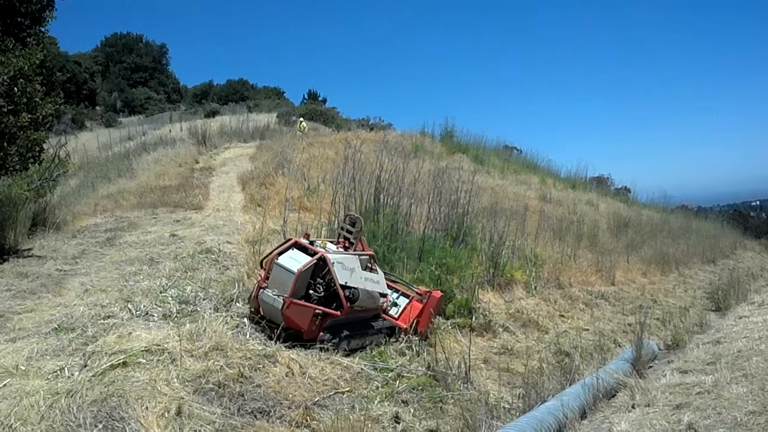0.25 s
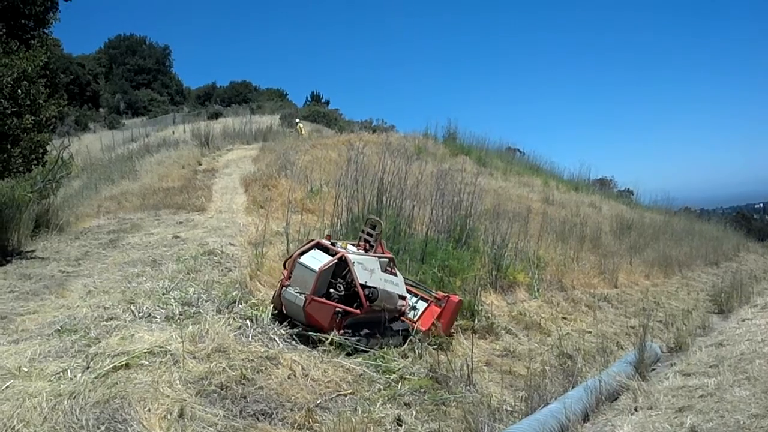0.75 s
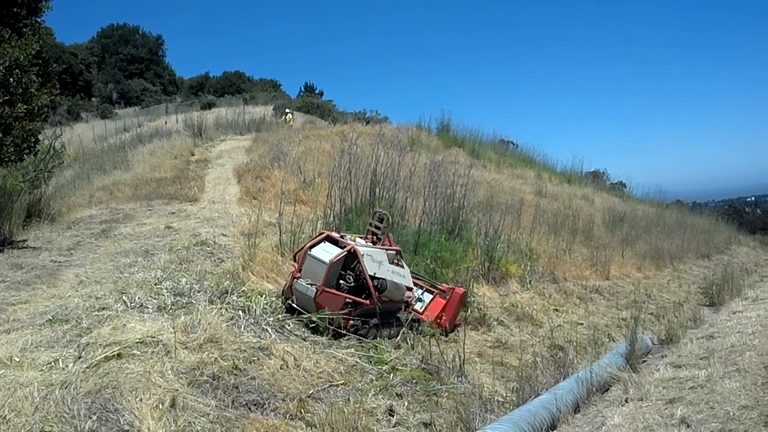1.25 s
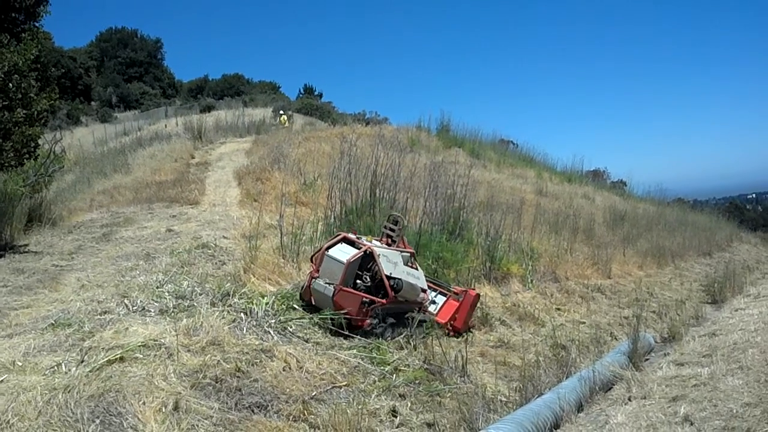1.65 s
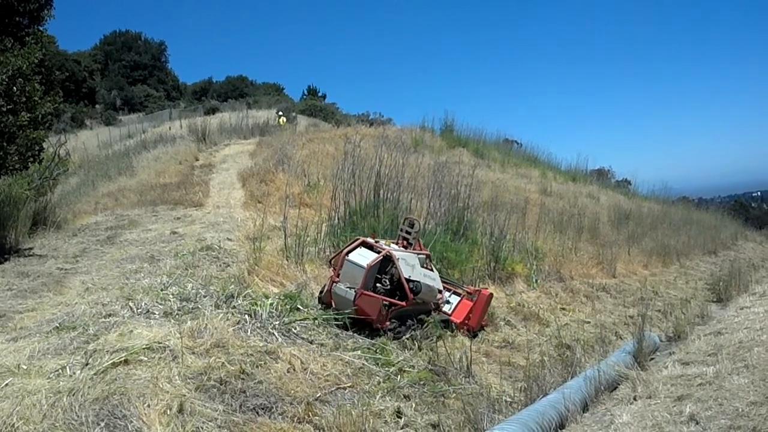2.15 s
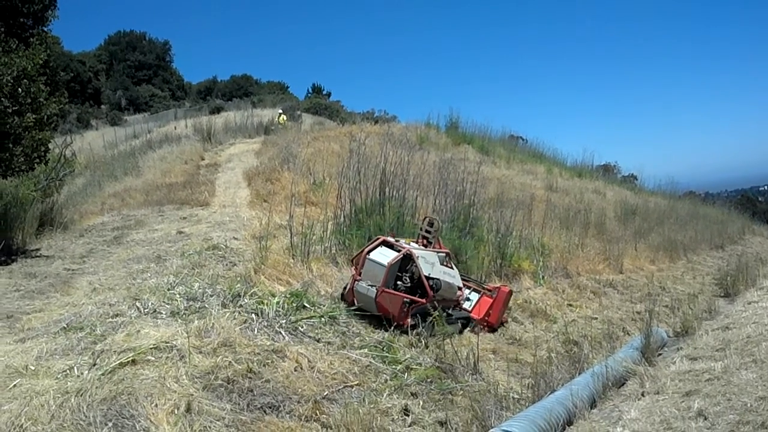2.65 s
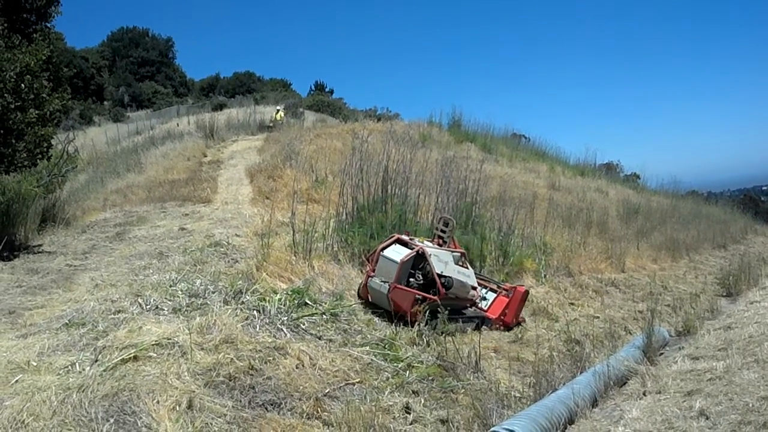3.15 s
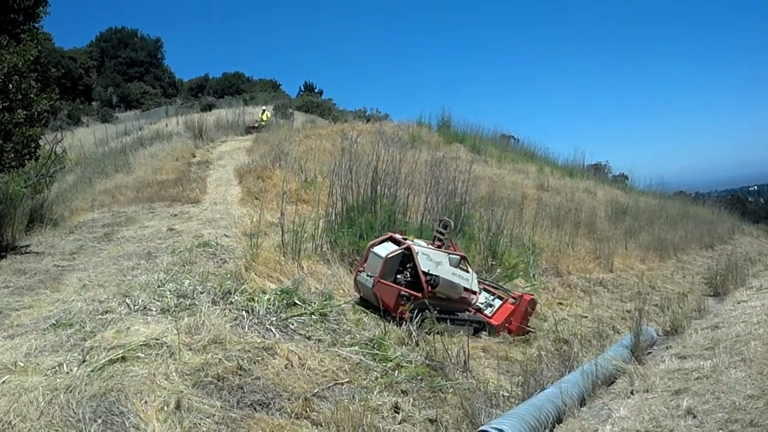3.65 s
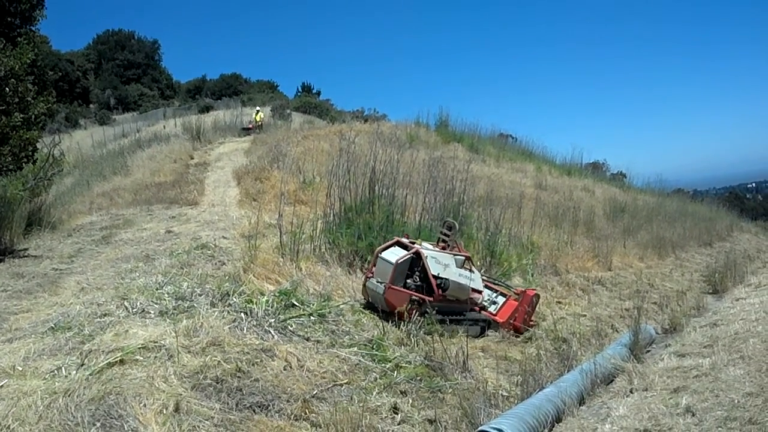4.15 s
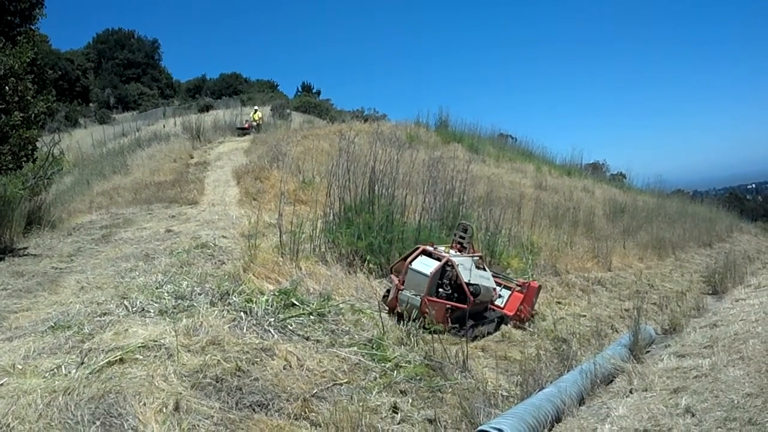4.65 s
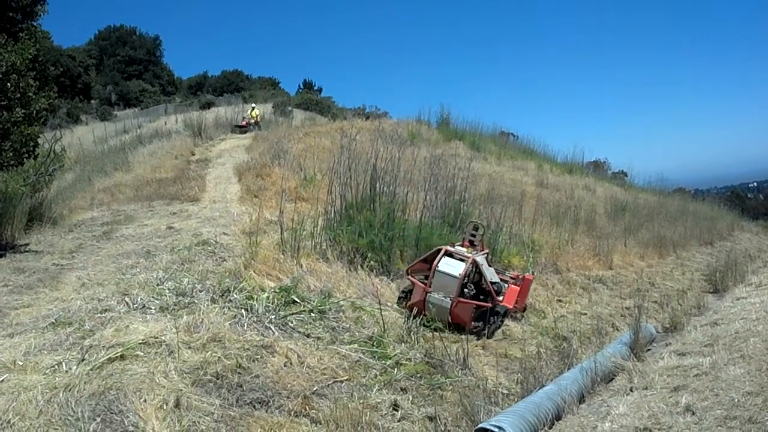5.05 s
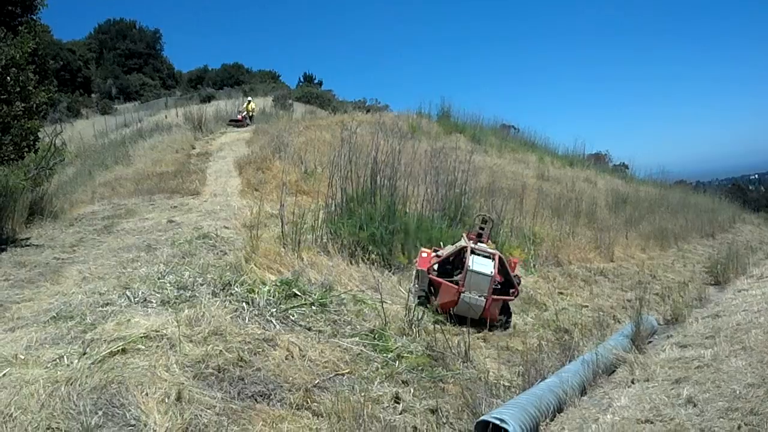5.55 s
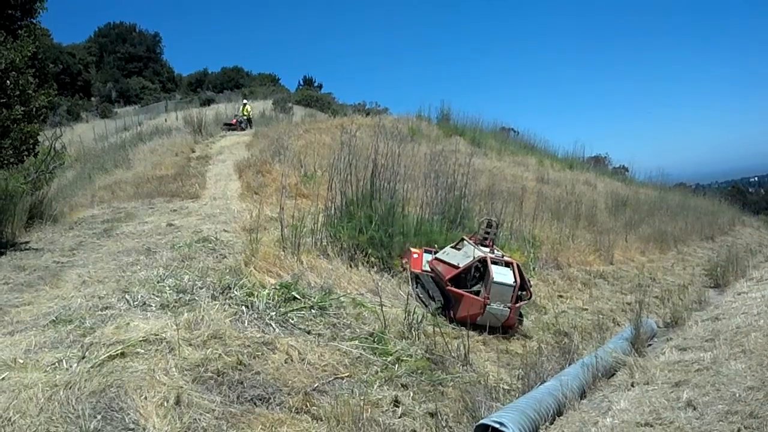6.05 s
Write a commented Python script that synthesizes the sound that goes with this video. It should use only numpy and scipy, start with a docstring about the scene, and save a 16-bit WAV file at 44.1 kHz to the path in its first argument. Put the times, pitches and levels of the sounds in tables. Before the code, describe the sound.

Outdoors on a dry grassy slope, a tracked flail mower runs continuously: uneven engine throb, metallic panel clatter, droning hum and a pulsing hiss of shredded stalks. Small ticks and hood rattles pepper it. Around halfway one hard snap makes the whole sound duck and slowly recover. Then cutting eases briefly as the machine turns, and wind rumbles and thuds against the close stereo microphones.

```python
"""A tracked flail mower works through dry grass on an open slope, heard by a close pair of microphones.
Uneven firings ring the V-twin's silencer, and its knocks shake a noisy clatter and sung orders from the panels.
The rotor hums, a higher hum swells late, and flails shred grass in a pulsing hiss of noise and cracks.
Filtered noise bursts make ticks, snaps, hood rattles and thuds; gusts rumble apart in left and right.
One hard snap drives a treble-sensing limiter, which ducks everything and lets go slowly."""
import sys
import numpy as np
from scipy import signal
from scipy.fft import rfft, irfft, next_fast_len
from scipy.io import wavfile
from scipy.ndimage import uniform_filter1d

SR = 44100
rng = np.random.default_rng(int(sys.argv[2]) if len(sys.argv) > 2 else 0)


def persist_wave(psi):
    """Save psi, clipped to +-1, as 16-bit WAV."""
    counts = np.round(np.clip(psi, -1, 1) * 32767).astype(np.int16)
    wavfile.write(sys.argv[1], SR, np.atleast_2d(counts).T)


N = 278484
TIME = np.arange(N) / SR
RECOVERY_DB_PER_S = 11.5  # climb of the level after a dip or a limited snap


def amp(db):
    """Decibels to gain."""
    return np.exp(np.asarray(db) * np.log(10) / 20)


def evened(x):
    """Scales to rms 1."""
    return x / np.sqrt(np.mean(x ** 2) + 1e-20)


def curve(rows, axis=1):
    """One column of a table of times, at every sample."""
    rows = np.array(rows)
    return np.interp(TIME, rows[:, 0], rows[:, axis])


def read(rows, hz, axis=1):
    """One column of a table of frequencies, on a log frequency axis."""
    rows = np.array(rows)
    return np.interp(np.log(hz + 1), np.log(rows[:, 0] + 1), rows[:, axis])


def causal(gain):
    """Gives a magnitude spectrum the phase of a thing that rings only after it is struck."""
    log_gain = np.log(gain + 1e-7)
    mirrored = np.r_[log_gain, log_gain[-2:0:-1]]
    return np.exp(np.conj(signal.hilbert(mirrored)))[:len(gain)]


def colour(x, spectrum, axis=1):
    """Causal filter with the given spectrum: it rings after a blow; rms 1."""
    gain = amp(read(spectrum, np.fft.rfftfreq(16384, 1 / SR), axis))
    taps = irfft(causal(gain))[:8192]
    return evened(signal.oaconvolve(np.atleast_2d(x), taps[None], axes=1)[:, :N])


def waver(rate_hz):
    """Smooth chance wandering of rms 1, up to the given rate."""
    t = np.linspace(0, N / SR, 1500)
    rates = np.geomspace(rate_hz / 8, rate_hz, 16)
    slow = sum(np.sin(2 * np.pi * (f * t + rng.random())) for f in rates)
    return np.interp(TIME, t, evened(slow))


def bursts(turns, beats, decay):
    """Power that jumps at each blow of the cycle and dies within a share of it; mean 1."""
    power = sum(amp(db) ** 2 * np.exp(-((turns - place) % 1) / decay) for place, db in beats)
    return power / power.mean()


def kicks(turns, beats, uneven):
    """One push at each blow of the cycle; its strength has a steady and a chance part."""
    out = np.zeros(N)
    for place, db in beats:
        at = np.flatnonzero(np.diff(np.floor(turns - place)))
        out[at] += amp(db) * (1 + uneven * rng.standard_normal(len(at)))
    return out


# sound travel from one capsule to the other, bending round the body between: (frequency [Hz], delay [s])
CAPSULE_DELAY = [(1400, 3.5e-4), (2830, 3.53e-4), (4150, 3.61e-4), (5500, 3.63e-4), (8300, 3.605e-4),
                 (13700, 3.64e-4)]


def port_angle(hz):
    """Half the phase by which sound reaches one capsule after the other."""
    return np.pi * hz * read(CAPSULE_DELAY, hz)


# width of the silent gaps cut round each comb null:
# (frequency [Hz], comb height at the gap's edge [share of full height])
GAP_WIDTHS = [(1400, 0.1), (2830, 0.34), (5500, 0.19), (8300, 0.31), (13700, 0.32)]


def gapped(comb, hz):
    """Filter shape that cuts a steep-sided silent gap round each null of a plain comb."""
    steep = (comb / read(GAP_WIDTHS, hz)) ** 6
    return comb * steep / (1 + steep)


# capsule difference against their sum, shaped by the ground reflection:
# (frequency [Hz], level [dB], part in phase [share], part in quadrature [share])
CAPSULE_DIFFERENCE = [(60, 8, -1, -0.83), (140, -2.5, -0.18, -1.17), (230, -11, -0.37, -0.95),
                      (320, -6, -0.29, -0.7), (428, 1, 0.68, 1), (503, 8.5, 0.25, -0.54),
                      (750, -15.5, -0.81, -1.8), (900, -11, 0.068, 0.092), (1490, -9.5, 0.12, -0.18),
                      (2110, -1, 0.94, -0.81), (3030, 2, -0.1, -0.94), (5000, -2, 0.019, -0.89),
                      (15000, 1, 0.34, -0.16)]


def capsules(direct, scattered):
    """Two close capsules, each less the delayed other, give interleaved combs; gaps are cut at the nulls."""
    size = next_fast_len(len(direct))
    hz = np.fft.rfftfreq(size, 1 / SR)
    a, b, angle = rfft(direct, size), rfft(scattered, size), port_angle(hz)
    like = read(CAPSULE_DIFFERENCE, hz, axis=2) + 1j * read(CAPSULE_DIFFERENCE, hz, axis=3)
    unlike = np.sqrt(np.clip(1 - abs(like) ** 2, 0, 1))
    difference = amp(read(CAPSULE_DIFFERENCE, hz)) * (like * a + unlike * b)
    mid = a * gapped(np.sin(np.maximum(angle, np.pi / 2)), hz)  # the bass of the sum is equalised flat
    side = difference * gapped(np.cos(angle), hz)
    return irfft([mid + side, mid - side], size)[:, :len(direct)]


# what the turning machine shows the microphones: (time [s], aspect [0 side, 1 rear, 2 far corner])
ASPECT = [(0, 0), (3.8, 0), (4.25, 0.53), (5.2, 1.4), (5.6, 1.3), (5.95, 1.58), (6.31, 1.85)]


def facing(side_db, rear_db, far_db):
    """Level in dB of a part that radiates differently to each aspect, as the machine turns."""
    return np.interp(curve(ASPECT), np.arange(3), [side_db, rear_db, far_db])


# engine speed, hunting on its governor: (time [s], four-stroke cycle rate [Hz])
ENGINE_SPEED = [(0.0, 28.32), (0.19, 28.57), (0.58, 28.26), (0.99, 28.84), (1.3, 28.28), (1.6, 28.32),
                (1.88, 28.77), (2.2, 27.95), (2.47, 28.39), (2.74, 28.18), (3.83, 28.31), (4.04, 28.85),
                (4.31, 27.94), (4.86, 28.44), (5.01, 28.02), (5.76, 28.0), (5.84, 28.3), (6.31, 28.14)]


def engine_turns():
    """Running count of engine cycles: the summed speed, which times every firing and knock."""
    return 0.366 + np.cumsum(curve(ENGINE_SPEED)) / SR


# flail rotor, slowly losing speed in the grass: (time [s], turning rate [Hz])
ROTOR_SPEED = [(0.0, 52.6), (0.8, 52.9), (1.3, 52.6), (2.1, 51.7), (2.8, 52.0), (3.4, 51.3), (4.6, 51.0),
               (5.3, 50.5), (6.31, 50.2)]


def rotor_turns():
    """Running count of rotor turns: the summed speed, which times the flails."""
    return np.cumsum(curve(ROTOR_SPEED)) / SR


# the two uneven firings: (place in the cycle [0-1], relative level [dB])
FIRING_BEATS = [(0.0, -4), (0.395, -3.6)]
# silencer response: (frequency [Hz], from the side [dB], from the far corner [dB])
SILENCER = [(28.4, -81, -86), (57, -23.5, -26), (85, -15.5, -18), (111.5, -9, -32), (133, 2, 0.5),
            (170, 1, -0.5), (181, -1, -3), (222, -2, -7), (252, 3.5, 7.5), (284, -16, -15.5),
            (341, -38, -42), (700, -53, -46)]


def exhaust(turns, uneven=0.046):
    """One puff per firing, each a little different, rings the silencer; its colour shifts with the turn."""
    puffs = kicks(turns, FIRING_BEATS, uneven)
    turned = curve(ASPECT) / 2
    from_side = colour(puffs, SILENCER)[0]
    from_corner = colour(puffs, SILENCER, axis=2)[0]
    throb = (1 - turned) * from_side + turned * from_corner
    return np.array([throb * amp(facing(side_db=-31, rear_db=-32, far_db=-31)), np.zeros(N)])


def clatter_db(load_share=0.21):
    """Level of block and panels: set by their aspect, plus a share of each dB of cutting above its mean."""
    bite = curve(CUTTING_LEVEL)
    return facing(side_db=-31.5, rear_db=-30.5, far_db=-31.1) + load_share * (bite - bite.mean())


# piston and valve knocks: (place in the cycle [0-1], relative level [dB])
KNOCK_BEATS = [(0.285, 13.5), (0.535, 16), (0.78, 9), (0, 11.5)]
# block and panel colour: (frequency [Hz], relative level per Hz [dB])
BLOCK_COLOUR = [(25, -54), (60, -39), (110, -12.5), (230, -8.5), (320, -11.5), (410, -9.5), (490, -14),
                (690, -5.5), (900, -4), (1000, -5), (1280, -12), (1430, -7.5), (1530, -8.5), (1650, -9),
                (2000, -11.5), (3200, -21), (8000, -30)]


def clatter(turns, knocking=0.16, ring=0.11, repeating=0.072, flutter_db=0.75):
    """Knocks shake block and panels; part of the rattle repeats exactly in every cycle."""
    size = 1500  # points of noise in the repeating cycle
    places = np.arange(size) / size
    cycles = rng.standard_normal((2, size))
    repeated = np.array([np.interp(turns, places, cycle, period=1) for cycle in cycles])
    fresh = rng.standard_normal((2, N))
    rattle = np.sqrt(repeating) * evened(repeated) + np.sqrt(1 - repeating) * fresh
    force = np.sqrt(1 - knocking + knocking * bursts(turns, KNOCK_BEATS, ring))
    return colour(rattle * force, BLOCK_COLOUR) * amp(clatter_db() + flutter_db * waver(13))


# engine orders that sing out of the panels, before their common trim against the clatter:
# (multiple of the cycle rate, from the side [dB], from behind [dB], from the far corner [dB])
SUNG_ORDERS = [(14, -20, -24, -4.5), (16, -23, -26, -22), (20, -15.5, -30, -26), (22, -14.5, -15, -23),
               (23, -14, -13, -14), (24, -7, -16.5, -2), (25, -12.5, -33, -28), (26, -11.5, -10, -14),
               (27, -10.5, -17, -16), (28, -9, -10, -3), (29, -14, -13, -3.5), (30, -10, -11, -24),
               (31, -18.5, -7.5, -13), (32, -9, -4.5, -9), (33, -37, -12, -12), (35, -25, -13, -22),
               (37, -31, -31, -32), (42, -14.5, -25, -32), (50, -14, -18, -11), (57, -16, -29, -19),
               (58, -17.5, -13, -15), (60, -24, -19, -20)]


def drone(turns, sung_db=-0.57, waver_db=2.5, slip_rad=0.66, lag=0.041):
    """Engine orders sing from the panels, loosely in step with the knocks; their mix follows the aspect."""
    tone = np.zeros(N)
    for order, *aspect_db in SUNG_ORDERS:
        level_db = facing(*aspect_db) + waver_db * waver(7)
        driven = sum(amp(db) * np.exp(-2j * np.pi * order * (place + lag)) for place, db in KNOCK_BEATS)
        phase = 2 * np.pi * order * turns + np.angle(driven) + slip_rad * waver(8)
        tone += amp(level_db) * np.cos(phase)
    return np.array([tone * amp(clatter_db() + sung_db), np.zeros(N)])


# rotor hum: (multiple of the rotor speed, straight from the hood [relative dB], by the ground [relative dB])
HUM_ORDERS = [(2, -0.5, -6), (3, 1.5, -2), (4, -3, -1), (5, -12.5, -5), (6, -11, -9)]


def rotor(flail_turns, waver_db=1.2):
    """The rows of flails beat the air in a low hum that rubs against the engine's orders."""
    hum = np.zeros((2, N))
    for order, direct_db, ground_db in HUM_ORDERS:
        tone = np.cos(2 * np.pi * (order * flail_turns + rng.random())) * amp(waver_db * waver(3.3))
        hum += amp([[direct_db], [ground_db]]) * tone
    return hum * amp(facing(side_db=-46, rear_db=-42, far_db=-46))


# a higher hum that swells and rises late in the turn: (time [s], frequency [Hz], level [dB])
LATE_HUM = [(4.6, 117, -59), (5.1, 118.8, -55), (6.3, 123, -40)]


def high_hum(waver_db=2.0):
    """A second low tone, faint and wavering until it swells and rises late in the turn."""
    tone = np.cos(2 * np.pi * np.cumsum(curve(LATE_HUM)) / SR)
    hum = tone * amp(curve(LATE_HUM, axis=2) + waver_db * waver(7.5))
    return np.array([hum, np.zeros(N)])


def patchy(x, depth_db):
    """Lets each stretch of the spectrum swell and fade on its own, over about 30 ms and 1 kHz; rms 1."""
    z = signal.stft(x, nperseg=256)[2]
    patches = uniform_filter1d(rng.standard_normal(z.shape[1:]), size=10, axis=1)  # along time
    patches = uniform_filter1d(patches, size=6, axis=0)  # along frequency
    return evened(signal.istft(z * amp(depth_db * evened(patches)))[1][:, :N])


# how much grass the flails bite, less while the machine swings round: (time [s], level [dB])
CUTTING_LEVEL = [(0, -36.5), (3.0, -35.5), (3.4, -36.5), (4.15, -42), (4.75, -36), (5.35, -36),
                 (5.9, -39.5), (6.31, -39)]
# grass shredding: (frequency [Hz], relative level per Hz [dB])
GRASS_COLOUR = [(100, -20), (800, 7), (2500, -59), (3050, 7), (3600, 7), (3900, 4), (4200, 7), (4650, 2),
                (5050, 1), (5600, 4), (6100, 0.5), (6700, -6), (7600, -1), (8800, -3), (9700, 0),
                (10500, 0), (11500, -7), (12600, -5), (14000, -7), (15800, -8)]


def cutting(turns, flail_turns, stalks_per_s=600, size_db=4, crackle_db=-11.0, pulsing=0.44,
            puff=0.14, chop=0.058, flutter_db=0.8, patchy_db=1.65):
    """Hiss and tiny cracks of dry stalks, pulsing with the firings and the passing flails."""
    stalk_sizes = amp(size_db * np.minimum(rng.exponential(1, N), 4))
    cracks = (rng.random(N) < stalks_per_s / SR) * stalk_sizes
    crackle = evened(cracks * rng.standard_normal((2, N)))
    grains = rng.standard_normal((2, N)) + amp(crackle_db) * crackle
    firing_beat = np.sqrt(1 - pulsing + pulsing * bursts(turns, FIRING_BEATS, puff))
    flail_beat = 1 + chop * np.cos(2 * np.pi * 2 * flail_turns)  # twice a turn
    shredding = patchy(colour(grains * firing_beat * flail_beat, GRASS_COLOUR), patchy_db)
    return shredding * amp(curve(CUTTING_LEVEL) + flutter_db * waver(25))


# brief dips of the level: (time at the bottom [s], depth [dB], fall [s])
LEVEL_DIPS = [(.18, 5, 0.18), (1.54, 4.5, 0.039), (1.681, 4, 0.058), (2.12, 3, 0.28), (4.56, 3.5, 0.17),
              (5.55, 4, 0.19)]


def dips():
    """Gain of the brief dips: a quick fall, then a steady climb; the deepest one counts."""
    each = []
    for s, db, fall in LEVEL_DIPS:
        corners = [s - fall, s, s + db / RECOVERY_DB_PER_S]
        each.append(np.interp(TIME, corners, [0, db, 0]))
    return amp(-np.max(each, axis=0))


# wind buffets on the microphones: (time [s], level [dB], half length [s])
WIND_BUFFETS = [(0.6, -44, 0.09), (4.06, -22, 0.0084), (4.148, -31, 0.018), (4.283, -24.5, 0.034),
                (4.427, -23, 0.022), (4.495, -28.5, 0.076), (4.804, -23.5, 0.028), (5.05, -37, .03),
                (5.432, -20.5, 0.015), (5.488, -18, 0.013), (5.553, -21, 0.016), (5.68, -26.5, 0.034),
                (6.244, -26, 0.057)]
# a breeze that comes up under the buffets, before its chance gusting: (time [s], level [dB])
BREEZE_LEVEL = [(3.3, -53), (3.55, -47), (3.8, -59), (4.2, -35), (4.68, -40.5), (5.1, -34), (5.35, -32.5),
                (5.85, -37.5), (6.1, -30.5), (6.31, -32)]
# rumble of a gust: (frequency [Hz], relative level per Hz [dB])
GUST_COLOUR = [(25, -4), (70, -3.5), (120, 9.5), (300, 1.5), (500, -16.5), (900, -51), (2000, -40),
               (6000, -59)]


def wind(mid_db=2.0, gusting_db=2.5):
    """Eddies hit each capsule separately, so their bass comes out opposed in left and right."""
    breeze = amp(curve(BREEZE_LEVEL) + gusting_db * waver(14))
    buffets = sum(amp(db) ** 2 * np.exp(-((TIME - s) / half) ** 2) for s, db, half in WIND_BUFFETS)
    push = np.sqrt(breeze ** 2 + buffets)
    a, b = rfft(colour(rng.standard_normal((2, N)), GUST_COLOUR) * push)
    hz = np.fft.rfftfreq(N, 1 / SR)
    angle = port_angle(hz)
    comb = np.sin(angle)
    mid = amp(mid_db) * a * np.where(angle < np.pi / 2, comb, gapped(comb, hz))
    side = b * gapped(np.cos(angle), hz)
    return irfft([mid + side, mid - side], N)


def blows(table, push):
    """Each burst is one sharp push and dying noise, filtered to ring around one pitch."""
    out, size, lead = np.zeros((2, N)), 8192, 44  # lead: samples kept ahead of the push
    t, hz = (np.arange(size) - lead) / SR, np.fft.rfftfreq(size, 1 / SR)
    end_fade = np.minimum(2 * (1 - t / t[-1]), 1) ** 2
    for s, db, t60, centre_hz, octaves in table:
        away = np.log2((hz + 1) / centre_hz) / octaves
        # steeper below the pitch than above
        shape = 1 / (1 + away ** 2 + np.minimum(away, 0) ** 4 + (away / 2) ** 4)
        fade = (t >= 0) * np.exp(-np.log(1000) * abs(t) / t60)
        force = fade * rng.standard_normal((2, size)) + push * np.linalg.norm(fade) * (t == 0)
        ringing = irfft(rfft(force) * causal(shape))
        hit = evened(capsules(*ringing) * end_fade)
        part = out[:, round(s * SR) - lead:][:, :size]
        part += (amp(db) * np.sqrt(np.mean(fade ** 2)) * hit)[:, :part.shape[1]]
    return out


# short bursts of filtered noise, from faint high ticks to one hard snap:
# (time [s], starting level [dB], 60 dB decay of the noise [s], centre [Hz], width [octaves])
TICKS_AND_SNAPS = [(.0707, -24.5, 0.017, 6000, 2.5), (.683, -26, 0.032, 5000, 1),
                   (.1466, -26.5, 0.011, 11000, 0.59), (1.5155, -29, 0.04, 5500, 1.3),
                   (1.6417, -22.5, 0.0057, 8100, 0.83), (1.8372, -30, .05, 4480, 0.88),
                   (1.9694, -26.5, 0.096, 4000, 0.83), (2.074, -32, 0.028, 3900, 0.24),
                   (2.69, -25, 0.069, 2600, 0.72), (2.93, -33.5, 0.67, 2820, 0.68),
                   (3.2005, -4, 0.0099, 5130, 0.53), (3.3613, -26, 0.12, 4450, 0.93),
                   (3.69, -30, 0.21, 3180, 0.98), (3.915, -30, 0.056, 4520, 1.1),
                   (4.162, -28, 0.14, 3000, 0.61), (4.2951, -30.5, 0.15, 3500, 0.71),
                   (4.788, -29.5, 0.033, 6000, 1.5), (4.85, -27.5, 0.29, 3740, 0.88),
                   (5.3168, -31, 0.048, 3800, 0.92), (5.4794, -30, 0.089, 4230, 0.2),
                   (6.0506, -31, 0.032, 6000, 1.4)]


def ticks_and_snaps():
    """Short bursts of filtered noise with a slight push, from faint high ticks to one hard snap."""
    return blows(TICKS_AND_SNAPS, push=0.1)


# cuttings flung against the hood:
# (time [s], starting level [dB], 60 dB decay of the force [s], centre [Hz], width [octaves])
HOOD_RATTLES = [(.822, -23.5, 0.091, 770, 0.22), (1.97, -28.5, 0.21, 1390, 0.69),
                (2.075, -30, 0.3, 1230, 0.69), (2.69, -28, 0.1, 1570, 0.37), (2.87, -32, 1, 980, 1),
                (2.94, -30.5, 0.45, 1490, 0.89), (3.0, -28, 0.22, 1110, 0.76),
                (3.361, -27, 0.43, 1150, 0.94), (4.162, -25, 0.061, 1260, 0.93),
                (4.29, -31, 0.13, 1490, 0.53), (4.883, -21, 0.089, 1070, .35),
                (4.897, -27, 0.086, 920, 0.32), (5.315, -29.5, 0.13, 1190, 0.47),
                (5.617, -26, 0.063, 860, 0.17), (6.19, -27.5, .4, 820, 0.25), (6.255, -27, 0.31, 850, 0.48)]


def rattles():
    """Flung cuttings rattle the hood: lower-pitched bursts, nearly all noise."""
    return blows(HOOD_RATTLES, push=0.039)


# dull thuds at the microphones, where the hardest gusts land:
# (time [s], starting level [dB], 60 dB decay of the force [s], centre [Hz], width [octaves])
GUST_THUDS = [(4.256, -22.5, 0.03, 195, .5), (4.4255, -14.5, 0.023, 370, 0.75),
              (4.434, -33, 0.04, 280, 0.4), (4.4485, -24, .04, 440, .5), (4.466, -21.5, 0.055, 460, 0.52),
              (5.407, -29, 0.041, 170, 1), (5.427, -16.5, 0.034, 368, 0.51), (5.447, -33, .06, 420, 0.67),
              (5.465, -26, .05, 330, .6), (5.481, -25, 0.12, 392, 1), (5.5415, -23.5, 0.051, 380, 0.53),
              (5.6875, -19.5, 0.034, 515, 0.52), (5.702, -32, .07, 430, 0.54)]


def thuds():
    """Hard gusts thump the microphones: low, with a push stronger than the noise."""
    return blows(GUST_THUDS, push=1.5)


def scene():
    """Engine and rotor drive the machine's steady sounds; short bursts and wind join them."""
    turns, flail_turns = engine_turns(), rotor_turns()
    engine = exhaust(turns) + clatter(turns) + drone(turns)
    machine = engine + rotor(flail_turns) + high_hum() + cutting(turns, flail_turns)
    hits = ticks_and_snaps() + rattles() + thuds()
    return capsules(*machine) * dips() + hits + wind()


def record(dry, threshold_db=-20, edge_hz=15840):
    """A limiter that listens to the treble clamps at once and recovers slowly; then the band limit."""
    treble = signal.sosfilt(signal.butter(2, 2500, "high", fs=SR, output="sos"), dry)
    power = abs(uniform_filter1d((treble ** 2).mean(0), size=88))  # over 2 ms
    power_db = 10 * np.log10(power + 1e-12)
    fall_db = TIME * RECOVERY_DB_PER_S
    held_db = np.maximum.accumulate(power_db + fall_db) - fall_db  # peaks, released at a steady rate
    over_db = np.maximum(held_db - threshold_db, 0)
    limited = dry / amp(uniform_filter1d(over_db, size=150))
    low_pass = signal.firwin(511, edge_hz, window=("kaiser", 9), fs=SR)
    return signal.oaconvolve(limited, low_pass[None], "same")


dry = scene()
out = record(dry)
persist_wave(out)
```